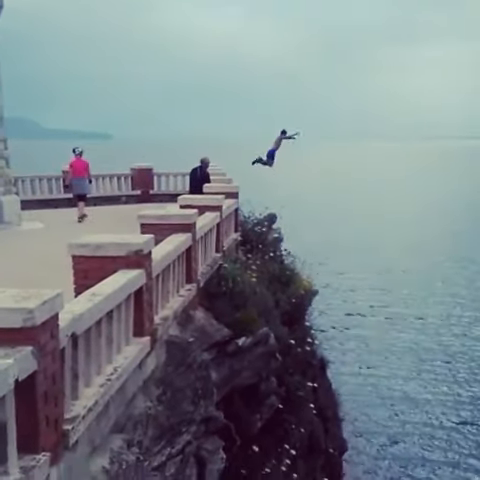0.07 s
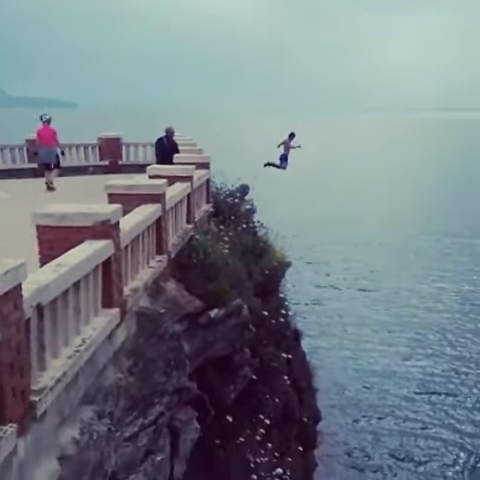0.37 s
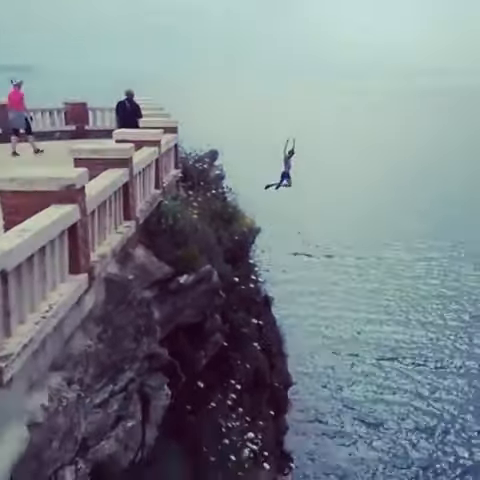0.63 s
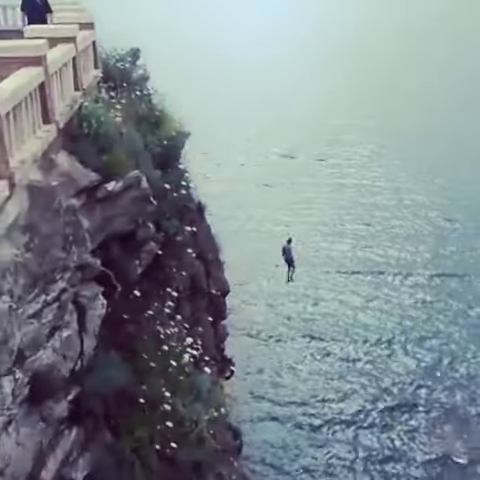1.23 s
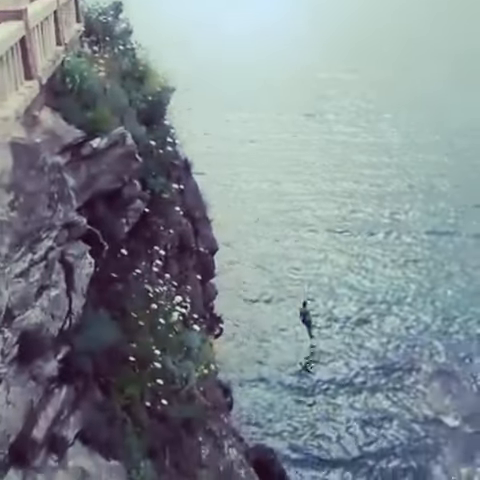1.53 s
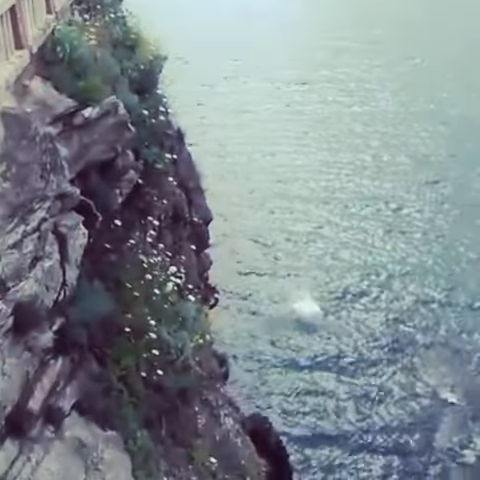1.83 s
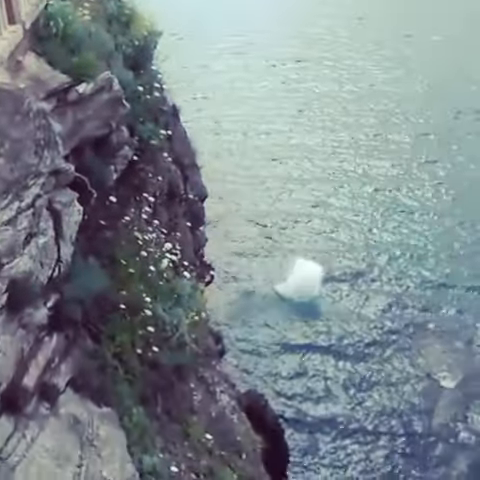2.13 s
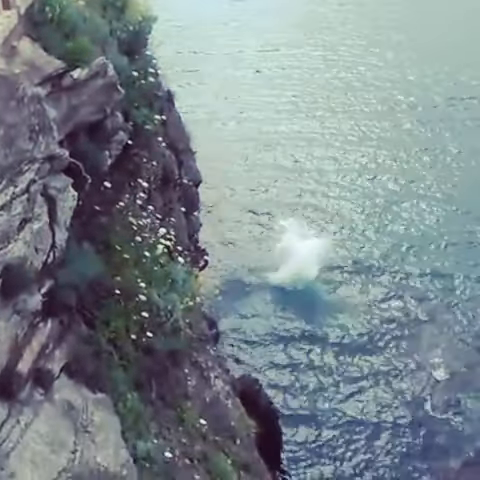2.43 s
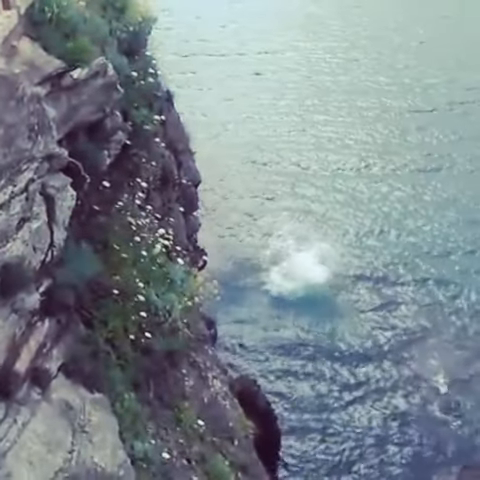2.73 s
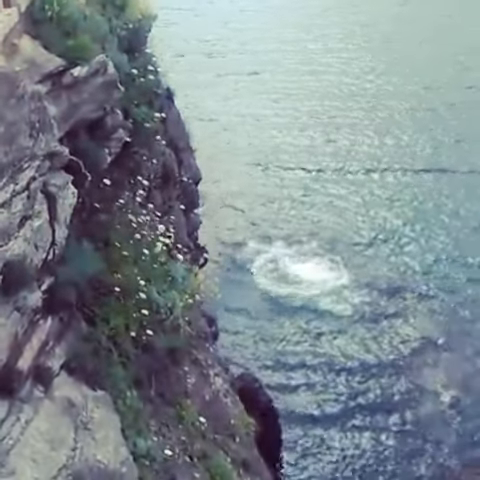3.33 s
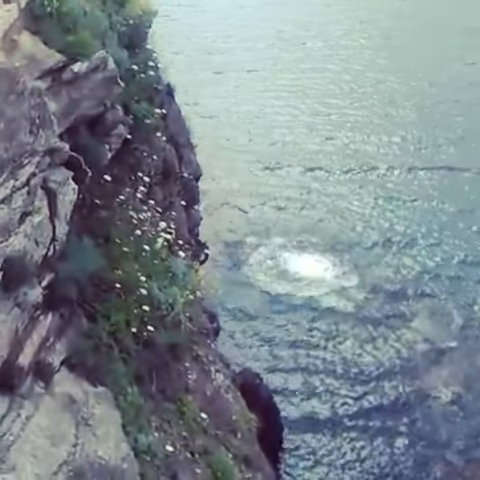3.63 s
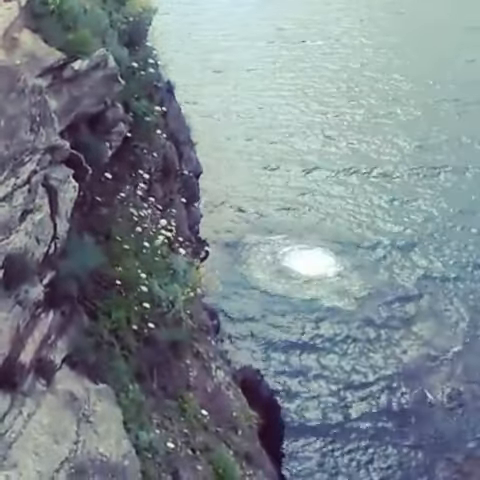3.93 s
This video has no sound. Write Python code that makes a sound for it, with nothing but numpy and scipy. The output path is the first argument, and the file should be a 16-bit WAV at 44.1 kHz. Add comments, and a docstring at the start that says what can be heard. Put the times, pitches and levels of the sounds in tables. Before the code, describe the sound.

A diver hits the sea with a hard smack and a burst of spray, then drops rain back into churning foam. Heard from a cliff top, with wind buffeting the microphone and water washing on the rocks below.

```python
"""Sea washes on the rocks below a cliff while wind buffets two microphone ports on the cliff top.
Two faint peeps and a high tick pass. At 1.85 s a diver hits the water with a hard smack, and air
trapped under the body rings. Sheets of spray burst out, the water churns, and the closing hole
shoots up a hissing plume. Its drops rain back into the foam, loudest near 3.4 s, and die away."""
import sys
import numpy as np
from scipy import signal
from scipy.fft import rfft, irfft, next_fast_len
from scipy.io import wavfile
from scipy.ndimage import uniform_filter1d, map_coordinates

SR = 44100
rng = np.random.default_rng(int(sys.argv[2]) if len(sys.argv) > 2 else 0)


def transcribe(u):
    """Save the signal u as a 16-bit wav file named by the first command-line argument.

    u: samples, shape (n,) or (channels, n), limited to [-1, 1]; the rate is SR.
    q: integer samples, one column per channel.
    """
    v = np.clip(np.atleast_2d(u).T, -1, 1)
    q = np.round(v * 32767).astype(np.int16)
    wavfile.write(sys.argv[1], SR, q)


N = 176400
T = np.arange(N) / SR
ENTRY_S = 1.8532

# Spectra of the noise sources. Each row: frequency in Hz, relative spectral density in dB.
WASH_SPECTRUM = [(100, -5), (400, -1), (800, 0), (1500, -3), (3200, -8), (4600, -21), (8000, -23.5),
                 (13000, -40)]
FOAM_SPECTRUM = [(1500, -6), (4000, 1.5), (8500, 6), (11000, 1), (13000, -8)]
RUSTLE_SPECTRUM = [(800, 3), (2500, 7.5), (5000, -4), (7500, 1), (11000, -3), (13000, -16)]
WIND_SPECTRUM = [(20, -36), (33, -28), (55, 0.5), (100, -1), (220, 1), (350, -7), (500, -12), (750, -23.5),
                 (1500, -38), (4000, -75)]
RAIN_SPECTRUM = [(300, -20), (800, -10), (1850, 1), (2350, -1), (3400, 0.5), (5300, -4.5), (6500, -5),
                 (8500, -3), (11000, -6.5), (13000, -13.5)]
CLUMP_SPECTRUM = [(1000, -16), (2500, 0), (5000, 8.5), (7000, 3.5), (10000, 1), (13000, -6)]
CHURN_SPECTRUM = [(200, -27), (500, 7.5), (1100, 4.5), (2000, 1), (4000, -8.5), (8000, -12.5), (13000, -17)]
JET_SPECTRUM = [(1000, -26), (3000, 2), (5000, 8), (6500, -1), (8500, 2), (11000, 6), (13000, -20)]
SPRAY_SPECTRUM = [(150, -24), (450, 8.5), (1000, -1), (1600, -0.5), (3500, -3), (5500, -10), (6500, -18),
                  (8200, -7.5), (11000, -18.5), (13000, -26)]
CRACK_SPECTRUM = [(200, -28), (380, -11), (520, 4), (1000, 3), (1500, 0), (2000, -1), (3100, -4),
                  (3900, -2.5), (5600, -11), (6300, -33), (7400, -7), (9000, -37), (11000, -14),
                  (13000, -39)]
# Slow envelopes of foam, wind, falling drops and churning water. Each row: time in seconds, level in dB.
FOAM_LEVELS = [(0, -62), (.11, -67), (.3, -58), (.55, -60), (1.2, -63), (1.6, -60.5), (1.75, -53.5),
               (1.84, -69), (4, -66)]
LEFT_WIND_LEVELS = [(0, -46), (.15, -38), (.3, -37.5), (.5, -34.5), (.62, -41.5), (.8, -40), (.93, -38.5),
                    (1.15, -33), (1.33, -40.5), (1.6, -29), (1.85, -37.5), (2.03, -39.5), (2.25, -33.5),
                    (2.85, -35), (3.15, -36.5), (3.33, -31), (3.55, -40.5), (4, -38.5)]
RIGHT_WIND_LEVELS = [(0, -30.5), (.2, -31.5), (.65, -42.5), (.78, -36), (.87, -34.5), (1.12, -33.5),
                     (1.35, -37.5), (1.66, -28), (1.8, -30.5), (2.05, -32.5), (2.3, -34.5), (2.45, -34.5),
                     (2.75, -43.5), (2.98, -33.5), (3.4, -30.5), (3.68, -28), (3.92, -30.5), (4, -32.5)]
RAIN_LEVELS = [(1.9, -92), (2.12, -62), (2.28, -43.5), (2.45, -46.5), (2.7, -44.5), (2.95, -40.5),
               (3.25, -34), (3.34, -32.5), (3.41, -31), (3.52, -35), (3.7, -40), (3.76, -47), (4, -57)]
CHURN_LEVELS = [(1.85, -80), (1.905, -32.5), (2.0, -38), (2.08, -46), (2.25, -39.5), (2.45, -52.5),
                (2.8, -47), (3.3, -37), (3.6, -45), (3.9, -52.5)]
# Transients. Each row: peak time in seconds, level in dB, rise in seconds, 60 dB decay time in seconds.
RUSTLE_BURSTS = [(.2, -46, 0.087, .33), (.402, -43, .003, 0.035), (1.416, -45, .001, .02)]  # rustles and clicks in the treble
CLUMP_BURSTS = [(2.77, -44, 0.018, 0.14), (3.25, -34, 0.029, 0.56), (3.39, -32, 0.014, 0.088),
                (3.455, -29, 0.067, 0.22)]  # clumps of water landing
SHEET_BURSTS = [(1.889, -18.5, 0.013, 0.1), (1.901, -27, .004, 0.043), (1.984, -35, 0.015, 0.1)]  # sheets of spray thrown out
SLAP_BURSTS = [(1.8553, -13.5, .0018, .016), (1.8575, -14.5, .001, .029)]  # feet, then trunk, hitting the surface
# Eddies striking the ports.
# Each row: time in seconds, left and right levels in dB, length in seconds, centre frequency in Hz.
EDDY_PUFFS = [(.008, -35, -26.5, 0.021, 198), (0.04, -27, -26, 0.0082, 238), (0.24, -30, -31, 0.012, 280),
              (0.313, -26, -57, 0.0086, 397), (0.445, -28, -35, 0.0056, 316),
              (0.499, -26, -43, 0.0086, 222), (0.782, -52, -28, .012, 220), (0.917, -29, -45, 0.019, 184),
              (1.033, -29.5, -41, 0.015, 200), (1.099, -21, -20.5, 0.0065, 250),
              (1.108, -18, -19, 0.0072, 270), (1.108, -27.5, -24, 0.021, 95),
              (1.15, -24.5, -29, 0.005, 219), (1.3, -28, -28.5, 0.0099, 276),
              (1.617, -25, -45, 0.0092, 253), (1.651, -42, -22, 0.012, 334), (1.749, -24.5, -37, 0.01, 263),
              (1.959, -42, -23.5, 0.011, 260), (2.086, -34.5, -28.5, 0.006, 396),
              (2.247, -31, -44, 0.025, 210), (2.633, -27.5, -46, 0.012, 180),
              (2.764, -29.5, -51, 0.0093, 235), (2.856, -22, -37, 0.0076, 205),
              (2.906, -32, -32, 0.0083, 206), (2.958, -21.5, -36, 0.0048, 249),
              (2.975, -30, -21.5, 0.0082, 297), (3.096, -30, -45, 0.016, 310),
              (3.322, -21.5, -47, 0.012, 285), (3.391, -26.5, -31, 0.014, 270),
              (3.619, -31, -37, 0.012, 248), (3.78, -34, -32, 0.012, 209), (3.927, -29, -27.5, 0.027, 258)]
# Far-off peeps. Each row: time in seconds, frequency in Hz, level in dB, length in seconds.
PEEP_TONES = [(0.636, 1212, -41.5, 0.017), (0.997, 2200, -45, 0.0059)]
# Modes of the tick and the air pocket. Each row: frequency in Hz, level in dB, 60 dB decay in seconds.
TICK_MODES = [(9400, -33.5, 0.013), (10700, -37, 0.012)]
POCKET_MODES = [(587, 3.5, 0.012), (950, -9, 0.012)]
# Sound arriving straight from the splash. Each row: frequency in Hz, share of the power.
DIRECT_SHARE = [(100, 1), (600, 1), (2300, 0.47), (3800, 0.043), (5000, 0.43), (7000, 0.13), (13000, 0.089)]
# Imbalance of the ports. Each row: frequency in Hz, level of left over right in dB.
LEFT_OVER_RIGHT = [(300, 5), (600, 0.5), (2200, -1.5), (4000, 2), (9000, 0.5), (12000, -5.5)]


def amp(db):
    """Amplitude grows tenfold for every 20 dB."""
    return 10 ** (np.asarray(db) / 20)


def unit(x):
    """Normalisation to an rms of 1."""
    return x / np.sqrt(np.mean(x ** 2) + 1e-20)


def along(points, hz):
    """Interpolation of (Hz, value) points on a logarithmic frequency axis."""
    knots_hz, values = np.transpose(points)
    return np.interp(np.log(hz + 1), np.log(knots_hz + 1), values)


def level(points):
    """An amplitude envelope, linear in decibels between (seconds, dB) points."""
    return amp(np.interp(T, *np.transpose(points)))


def wobble(knots_per_s):
    """Smooth random modulation: a spline through Gaussian values."""
    return map_coordinates(rng.standard_normal(4096), [T * knots_per_s], mode="wrap")


def bell(t, length):
    """A Gaussian envelope centred on t = 0."""
    return np.exp(-2 * (t / length) ** 2)


def burst(start, rise, t60):
    """A linear rise, then exponential decay by 60 dB in t60 seconds."""
    t = T - start
    return np.clip(t / rise, 0, 1) * amp(-60 * np.maximum(t - rise, 0) / t60)


def bursts(rows):
    """Incoherent bursts add in power to form one envelope."""
    return np.sqrt(sum((amp(db) * burst(peak - rise, rise, t60)) ** 2 for peak, db, rise, t60 in rows))


def ring(start, modes, attack_s):
    """Free vibration: damped sines of alternating sign with a soft onset."""
    t = np.maximum(T - start, 0)
    partials = sum((-1) ** k * amp(db - 60 * t / t60) * np.sin(2 * np.pi * hz * t)
                   for k, (hz, db, t60) in enumerate(modes))
    return partials * (1 - np.exp(-t / attack_s))


def filtered(x, response):
    """Linear filtering multiplies the spectrum by a frequency response."""
    size = next_fast_len(N + SR // 2)
    return irfft(rfft(x, size) * response(np.fft.rfftfreq(size, 1 / SR)), size)[..., :N]


def coloured(x, spectrum):
    """Spectral shaping, normalised to an rms of 1."""
    return unit(filtered(x, lambda hz: amp(along(spectrum, hz))))


def noise(spectrum, channels=2):
    """Coloured Gaussian noise, uncorrelated between channels."""
    return coloured(rng.standard_normal((channels, N)), spectrum)


def patchy(x, depth_db):
    """Random modulation in patches of frequency and time, normalised to an rms of 1."""
    frames = signal.stft(x, nperseg=512)[2]
    field = uniform_filter1d(rng.standard_normal(frames.shape[1:]), 4, axis=0)
    field = uniform_filter1d(field, 9, axis=1)
    return unit(signal.istft(frames * amp(depth_db * unit(field)), nperseg=512)[1][:, :N])


def from_left(x, lead_s=0.00018):
    """The shorter path brings the sound to the left port first."""
    return filtered(x, lambda hz: np.exp(1j * np.pi * hz * lead_s * np.array([[1], [-1]])))


def placed(signals):
    """Power divides between a direct path (first signal) and scatter off cliff and sea (other two)."""
    direct = filtered(signals[0], lambda hz: np.sqrt(along(DIRECT_SHARE, hz)))
    scattered = filtered(signals[1:], lambda hz: np.sqrt(1 - along(DIRECT_SHARE, hz)))
    return from_left(direct) + scattered


def sea():
    """Wash and fizzing foam are broadband noise under random modulation, with brief rustles and clicks."""
    wash = patchy(noise(WASH_SPECTRUM), depth_db=1.8) * amp(-46 + wobble(13))
    foam = patchy(noise(FOAM_SPECTRUM), depth_db=3.5) * level(FOAM_LEVELS) * amp(2.6 * wobble(35.15))
    return wash + foam + noise(RUSTLE_SPECTRUM) * bursts(RUSTLE_BURSTS)


def peeps():
    """Two faint, far-off tone pulses waver by random phase modulation."""
    return sum(amp(db) * bell(T - time, length) * np.sin(2 * np.pi * hz * T + wobble(150))
               for time, hz, db, length in PEEP_TONES)


def tick():
    """Two high, quickly damped modes make one faint tick on the right."""
    return ring(1.4145, TICK_MODES, attack_s=0.0004) * amp([[-7], [0]])


def eddies(width_octaves=0.79, cutoff_hz=565, size=4096):
    """An eddy striking a port is a brief pressure fluctuation: a puff of low, band-limited noise."""
    out, k = np.zeros((2, N + 2 * size)), np.arange(size)
    hz = np.fft.rfftfreq(size, 1 / SR) + 1
    rolloff = np.sqrt(1 + (hz / cutoff_hz) ** 6)
    for time, left_db, right_db, length, centre_hz in EDDY_PUFFS:
        band = np.exp(-.5 * (np.log2(hz / centre_hz) / width_octaves) ** 2) / rolloff
        envelope = bell((k - size / 2) / SR, length)
        puff = irfft(rfft(rng.standard_normal((2, size))) * band) * envelope
        puff *= np.linalg.norm(envelope) / np.linalg.norm(puff, axis=1, keepdims=True)
        out[:, round(time * SR) + k] += amp([[left_db], [right_db]]) * puff
    return out[:, size // 2:][:, :N]


def wind():
    """Turbulence is local, so each port has its own lumpy rumble, with single stronger eddies."""
    lumps = unit(amp(1.52 * np.array([wobble(70), wobble(70)])))
    gusts = np.array([level(LEFT_WIND_LEVELS), level(RIGHT_WIND_LEVELS)])
    return noise(WIND_SPECTRUM) * gusts * lumps + eddies()


def patter(drops_per_s=1400, low_hz=900, high_hz=13000, spread_db=3.4, length_cycles=2.8):
    """Shot noise: drops land at random times, each impact a damped sine a few cycles long."""
    draws = rng.random((40000, 4))[:int(drops_per_s * N / SR)]
    onset, pitch, weight, polarity = np.hsplit(draws, 4)
    hz, k = low_hz + (high_hz - low_hz) * pitch, np.arange(128)
    cycles = hz * k / SR
    drop_db = -spread_db * np.log(np.maximum(weight, np.exp(-5)))
    strength = amp(drop_db) * np.sqrt(hz) * np.sign(polarity - .5)  # the root evens energy over pitch
    impacts = strength * np.sin(2 * np.pi * cycles) * np.exp(-2 * cycles / length_cycles)
    samples = (onset * N).astype(int) + k
    return unit(np.bincount(samples.ravel(), impacts.ravel(), N)[:N])


def droplets(spectrum, mist_db=-2):
    """Separate drop impacts are superposed on the continuous hiss of fine mist."""
    drops = np.array([patter() for _ in range(3)])
    mist = amp(mist_db) * rng.standard_normal((3, N))
    return placed(coloured(drops + mist, spectrum))


def shower():
    """The plume falls back as impact noise: uneven flurries of drops and a few heavy clumps."""
    rain = patchy(droplets(RAIN_SPECTRUM), depth_db=3.5) * level(RAIN_LEVELS) * amp(0.45 * wobble(34.89))
    clumps = droplets(CLUMP_SPECTRUM) * bursts(CLUMP_BURSTS)
    flurries = amp(1.1 * wobble(160))
    return (rain + clumps) * flurries


def churn():
    """Turbulent water round the hole radiates patchy midrange noise."""
    return patchy(placed(noise(CHURN_SPECTRUM, channels=3)), depth_db=2.5) * level(CHURN_LEVELS)


def jet(peak_s=1.942, rise_s=0.075):
    """The collapse of the hole shoots up a jet of fine, hissing spray."""
    return droplets(JET_SPECTRUM) * amp(-37) * burst(peak_s - rise_s, rise_s, t60=0.095)


def spray():
    """Displaced water flies out in sheets and splatters; the two add in power."""
    splatter = amp(-27) * burst(ENTRY_S, rise=0.014, t60=0.43)
    return patchy(droplets(SPRAY_SPECTRUM), depth_db=2.0) * np.hypot(bursts(SHEET_BURSTS), splatter)


def smack(pocket_delay_s=0.0017):
    """The impact of feet and trunk radiates a crack and compresses an air pocket, which resonates."""
    crack = placed(noise(CRACK_SPECTRUM, channels=3)) * bursts(SLAP_BURSTS)
    pocket = ring(ENTRY_S + pocket_delay_s, POCKET_MODES, attack_s=0.001)
    return crack + from_left(pocket)


def scene():
    """Superposition: the pressures of the dive and its background add."""
    dive = smack() + spray() + jet() + churn() + shower()
    return dive + sea() + wind() + tick() + peeps()


def record(dry):
    """Each port has its own frequency response, and both share a sharp band limit."""
    top_hz = 13100
    sides = np.array([[.5], [-.5]])
    return filtered(dry, lambda hz: amp(along(LEFT_OVER_RIGHT, hz) * sides) * (hz < top_hz))


dry = scene()
out = record(dry)
transcribe(out)
```